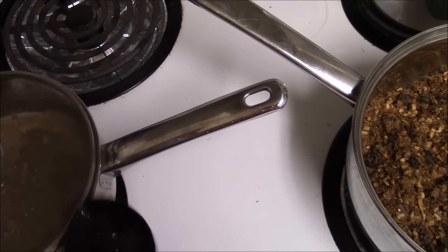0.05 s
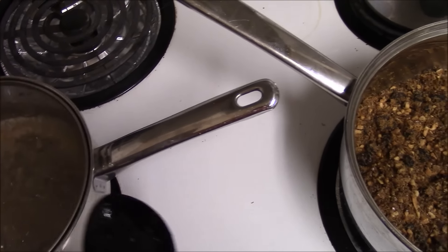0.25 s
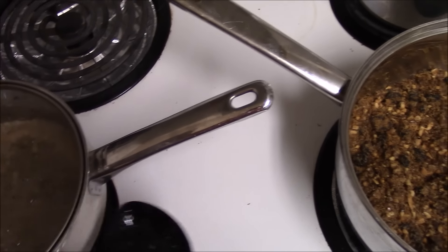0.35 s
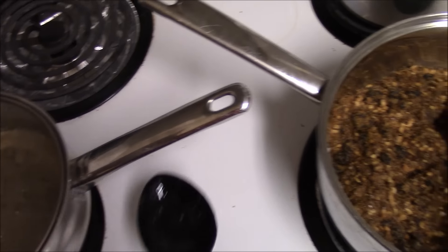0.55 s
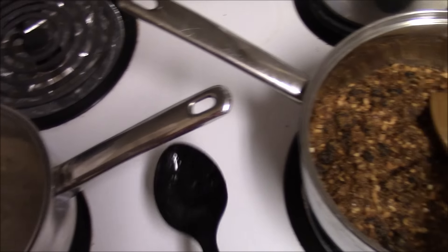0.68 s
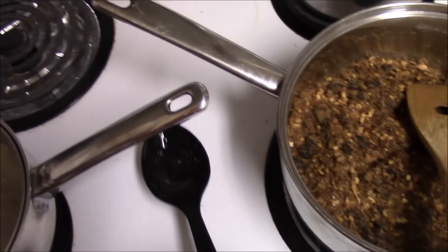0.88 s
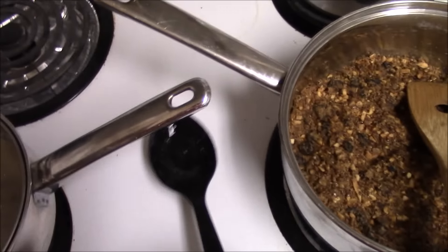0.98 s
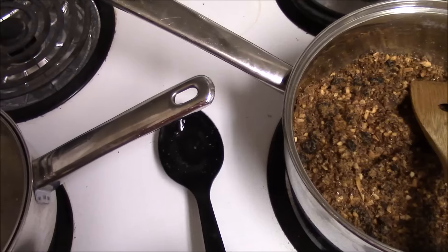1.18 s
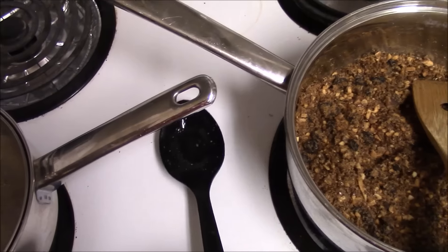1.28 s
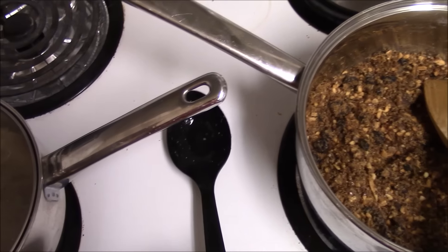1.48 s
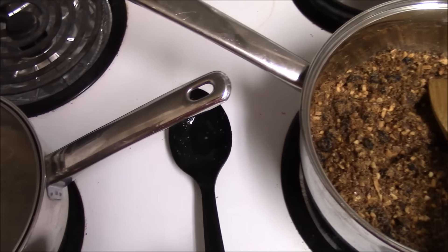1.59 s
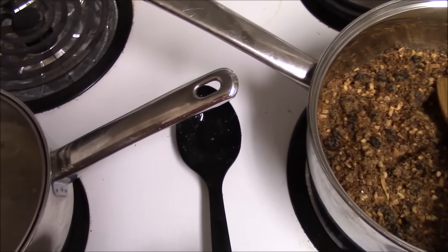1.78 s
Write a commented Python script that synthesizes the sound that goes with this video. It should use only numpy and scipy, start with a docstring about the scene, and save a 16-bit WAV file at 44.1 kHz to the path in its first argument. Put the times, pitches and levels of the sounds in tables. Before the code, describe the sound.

Loud clatter of a metal saucepan set down on an electric stove, fading into even rocking ticks, then a hollow thud and a few small bright spoon taps, heard close up in a small kitchen with fan hum.

```python
"""In a small kitchen with a fan hum, a steel saucepan lands on a coil burner, clatters and rocks to rest.
Soft bumps precede it; dull stove-top knocks and plastic spoon taps on a steel handle follow.
Impacts excite decaying modes, dense ringing in noise bands and a contact click (modal synthesis).
Friction and fan are coloured noise, hum is narrow resonances driven by noise, and the room is a
decaying noise tail."""
import sys
import numpy as np
from scipy import signal
from scipy.fft import rfft, irfft, next_fast_len
from scipy.io import wavfile
from scipy.ndimage import uniform_filter1d

SR = 44100
rng = np.random.default_rng(int(sys.argv[2]) if len(sys.argv) > 2 else 0)


def undo_db(level):
    """Turn decibels back into plain size, where 20 dB means ten times bigger."""
    steps = np.asarray(level, float) / 20
    return 10 ** steps


def master(y):
    """Save y as 16-bit WAV."""
    cut = np.clip(np.atleast_2d(y).T, -1, 1)
    pcm = np.round(cut * 32767)  # scale
    wavfile.write(sys.argv[1], SR, pcm.astype(np.int16))


N = 81585  # samples


def at(table, hz):
    """Interpolation on a log-frequency axis: read (Hz, value) points."""
    table = np.array(table, float)
    return np.interp(np.log(hz), np.log(table[:, 0]), table[:, 1])


def shaped(x, gain):
    """Linear filtering: multiply the spectrum by a gain given as a function of Hz."""
    hz = np.maximum(np.arange(N + 1) * SR / (2 * N), 1)
    return irfft(rfft(x, 2 * N) * gain(hz), 2 * N)[:len(x)]


# third-octave band centres [Hz]
BANDS = 30 * 2 ** np.arange(0, 9.2, 1 / 3)


def noise_bands():
    """Third-octave analysis in reverse: independent noise bands of equal level per Hz."""
    size = next_fast_len(N)
    f = np.maximum(np.arange(size // 2 + 1) * SR / size, 1)
    for hz in BANDS:
        white = rng.standard_normal((2, len(f))) * np.sqrt(size / 2)
        gain = np.cos(np.pi / 2 * np.clip(3 * np.log2(f / hz), -1, 1))
        yield hz, irfft((white[0] + 1j * white[1]) * gain, size)[:N]


def decay(kicks, t60, hz=0):
    """Damped resonance: each kick dies by 60 dB over t60 [s] while its phase turns at hz."""
    pole = np.exp((2j * np.pi * hz - np.log(1000) / t60) / SR)
    return signal.lfilter([1], [1, -pole], kicks)


def t60_at(pair, hz):
    """Frequency-dependent damping: log interpolation of decay times given at 300 Hz and 8 kHz."""
    return np.exp(at([(300, np.log(pair[0])), (8000, np.log(pair[1]))], hz))


def strike(blows, modes, body, t60, mode_db, body_db, click_db, scatter_db, rise_s):
    """Modal impact: blows excite modes, dense ringing and a click; soft contact lowpasses the force."""
    start_s, level_db, corner_hz = np.array(blows, float).T
    i = np.clip((start_s * SR).astype(int), 0, N - 1)

    def kicks(hz, extra):
        """Contact spectrum: impulses weakened above each blow's corner."""
        force = np.zeros(N, complex)
        np.add.at(force, i, undo_db(level_db) / np.sqrt(1 + (hz / corner_hz) ** 6) * extra)
        return force

    out = np.zeros(N)
    mode_scatter = rng.standard_normal((len(blows), len(modes)))
    for k, (hz, db, mode_t60) in enumerate(modes):
        push = kicks(hz, undo_db(db + mode_db + scatter_db * mode_scatter[:, k]))
        # subtracting a short decay softens the onset
        out = out + (decay(push, mode_t60, hz) - decay(push, 4 * rise_s, hz)).imag

    rise = np.hanning(max(int(rise_s * SR), 1) + 2)[1:-1]
    band_scatter = rng.standard_normal((len(blows), len(BANDS)))
    for k, (hz, band) in enumerate(noise_bands()):
        power = kicks(hz, undo_db(scatter_db * band_scatter[:, k])).real ** 2
        # power falls twice as fast in dB as the amplitude decay used by the filter
        ringing = np.abs(decay(power, t60_at(t60, hz) / 2).real)
        click = undo_db(2 * click_db) * np.abs(decay(power, 0.0066).real)
        envelope = np.convolve(np.sqrt(ringing + click), rise / rise.sum())[:N]
        out = out + undo_db(at(body, hz) + body_db) * band * envelope
    return out


def steady(colour, db, flicker_db, rate):
    """Stationary coloured noise: band levels wander independently; the sum is scaled to db."""
    hold = int(SR / rate)
    out = np.zeros(N)
    for hz, band in noise_bands():
        steps = np.repeat(rng.standard_normal(N // hold + 1), hold)
        flicker = flicker_db * uniform_filter1d(steps, hold)[:N]
        out = out + undo_db(at(colour, hz) + flicker) * band
    return out * undo_db(db) / np.std(out)


FAN_DB = -43  # level before any stereo filtering
# fan noise spectrum: pitch_hz [Hz], relative level_db [dB per Hz]
FAN_COLOUR = [(25, -50), (60, -37.5), (100, -25.5), (160, -16), (220, -8), (320, -5), (450, -10.5),
              (600, -16), (1000, -19), (2000, -32.5), (4000, -40), (8000, -43.5), (13000, -51.5),
              (16000, -62)]


def fan():
    """Broadband flow-like noise: a low-weighted spectrum with slow band flicker."""
    return steady(FAN_COLOUR, FAN_DB, flicker_db=2.0, rate=11)


# filter for the fan's left-right difference: pitch_hz [Hz], gain_db [dB]
FAN_SIDE_GAIN = [(60, -13), (110, -10), (200, -25.5), (380, -27), (700, -20.5), (1290, -17.5), (2380, -10),
                 (5000, -11), (8000, -16), (11000, -35), (16000, -50.5)]


def fan_side():
    """Interchannel decorrelation: a separate fan noise, opposite in sign left and right."""
    noise = steady(FAN_COLOUR, FAN_DB + 3.5, flicker_db=1.5, rate=12)
    return shaped(noise, lambda f: undo_db(at(FAN_SIDE_GAIN, f)))


# wavering tones of fan and mains: pitch_hz [Hz], level_db [dB], width_hz [Hz]
HUM_TONES = [(121.4, -56.5, 21), (295.5, -52.5, 14), (343.4, -47.5, 4.8), (414.2, -55.5, 7.5)]


def hum():
    """Narrowband resonance: noise rings sharp filters, giving wavering tones of fan and mains."""
    out = np.zeros(N)
    for pitch_hz, level_db, width_hz in HUM_TONES:
        tone = decay(rng.standard_normal(N), np.log(1000) / (np.pi * width_hz), pitch_hz).imag
        out = out + undo_db(level_db) * tone / np.std(tone)
    return out


# faint scraping of pan and spoon: start_s [s], level_db [dB]
SCRAPE_LEVEL = [(0, -47), (.03, -49), (.06, -46), (.095, -44), (.2, -54), (.55, -52.5), (.7, -51),
                (.85, -58), (1.0, -76), (1.25, -62), (1.33, -59.5), (1.47, -58.5), (1.6, -67.5),
                (1.85, -58)]
# friction spectrum: pitch_hz [Hz], relative level_db [dB per Hz]
SCRAPE_SPECTRUM = [(400, -39.5), (1000, -4.5), (3300, 0), (4200, -9), (8000, -12.5), (16000, -31)]
# treble change above about 4 kHz: start_s [s], gain_db [dB]
SCRAPE_TREBLE = [(0, 1.5), (.1, 1), (.3, -2), (1.85, -22)]


def scrape():
    """Friction as flickering noise, its level and treble following separate envelopes."""
    t = np.arange(N) / SR
    noise = steady(SCRAPE_SPECTRUM, 0, flicker_db=5.0, rate=50)
    low = shaped(noise, lambda f: 1 / (1 + (f / 4200) ** 8))
    treble = undo_db(np.interp(t, *np.array(SCRAPE_TREBLE).T)) * (noise - low)
    return undo_db(np.interp(t, *np.array(SCRAPE_LEVEL).T)) * (low + treble)


# soft hollow bumps before the landing: start_s [s], relative level_db [dB], contact corner_hz [Hz]
BUMP_BLOWS = [(.004, -40, 700), (.03, -37, 700), (.063, -36.5, 700), (.072, -33, 700), (.0835, -21, 590),
              (.098, -23, 600)]
# bump resonances: pitch_hz [Hz], relative level_db [dB], t60_s [s]
BUMP_RESONANCES = [(396.7, 5, 0.1), (500, -19.5, 0.04)]
# dense stove-top ringing, also for thumps and knocks: pitch_hz [Hz], relative level_db [dB per Hz]
TOP_SPECTRUM = [(60, -53), (125, -23.5), (170, -40.5), (279, -1), (500, -3), (1000, -5.5), (2160, -23),
                (4000, -13.5), (8000, -25.5), (16000, -50)]
TOP_T60_S = .2, 0.047  # at 300 Hz and 8 kHz


def bumps():
    """Low-mode impact: soft contact excites chiefly two hollow resonances."""
    return strike(BUMP_BLOWS, BUMP_RESONANCES, TOP_SPECTRUM, TOP_T60_S,
                  mode_db=1.0, body_db=4, click_db=-9, scatter_db=3.0, rise_s=0.0021)


# pan blows: start_s [s], relative level_db [dB], contact corner_hz [Hz] (lower = softer)
CRASH_BLOWS = [(.105, -19.5, 12000), (.117, -14, 12200), (.1218, -6, 5040), (.129, -8.5, 4000),
               (.1398, -9.5, 11000), (.146, -9, 5050), (.152, -14, 14100), (.167, -13.5, 7900),
               (.178, -10.5, 6000), (.186, -23, 12000), (.191, -14.5, 12000), (.198, -16.5, 6000),
               (.208, -28, 5000), (.219, -24, 4923), (.232, -18, 6000), (.247, -25, 14100),
               (.263, -17.5, 5000), (.272, -19, 4870), (.281, -23, 4820), (.296, -36, 4030),
               (.32, -39, 3050), (.565, -40.5, 3000)]
# pan resonances, also for rocking: pitch_hz [Hz], relative level_db [dB], t60_s [s]
PAN_RESONANCES = [(610, -10, .2), (742, -11, .15), (904, -7, .22), (1085, -10, .6), (1240, -18, .2),
                  (1513, -7, .18), (1782, -10, .15), (1999, -1, .11), (2107, -7, .13), (2150, -7, .13),
                  (2509, -8, .13), (2700, -9, .12), (3089, -4, .15), (3643, -5, .12), (3993, -11, .12),
                  (4133, -3, .14), (5669, -16, .08), (6632, -16, .08)]
# dense pan ringing, also for chimes: pitch_hz [Hz], relative level_db [dB per Hz]
PAN_SPECTRUM = [(60, -56), (125, -21), (170, -24), (256, -1), (515, -13.5), (1000, -7), (1410, -15),
                (2050, -6), (4000, -11.5), (5000, -17.5), (7750, -16), (12700, -27.5), (16000, -45)]
PAN_T60_S = 0.19, 0.14  # at 300 Hz and 8 kHz


def pan_crash():
    """Repeated modal impact: hard blows, with weakening random chatter of pan on coil among them."""
    first_s, last_s = .122, 0.26
    u = rng.random((30, 2))
    after_s = (last_s - first_s) * u[:, 0]
    level_db = -18.5 - 87 * after_s - 8 * u[:, 1]
    chatter = np.c_[first_s + after_s, level_db, np.full(30, 6000)]  # corner in Hz
    return strike(np.r_[CRASH_BLOWS, chatter], PAN_RESONANCES, PAN_SPECTRUM, PAN_T60_S,
                  mode_db=-11, body_db=11.5, click_db=4, scatter_db=2.5, rise_s=0.00031)


# burner thumps under the pan's weight: start_s [s], relative level_db [dB], contact corner_hz [Hz]
THUMP_BLOWS = [(.122, -11.5, 500), (.1285, -11, 500), (.14, -11.5, 500), (.167, -25, 500),
               (.208, -16.5, 600), (.218, -18.5, 600), (.27, -28, 603), (.318, -23, 600)]
# burner resonances: pitch_hz [Hz], relative level_db [dB], t60_s [s]
BURNER_RESONANCES = [(125, -8, .25), (230, -8, .1), (264, 0, .12), (345, -6, .15), (445, -8, .12)]


def burner_thumps():
    """Load impact: the pan's weight excites low burner modes."""
    return strike(THUMP_BLOWS, BURNER_RESONANCES, TOP_SPECTRUM, TOP_T60_S,
                  mode_db=-2.0, body_db=12, click_db=-4.5, scatter_db=1.5, rise_s=0.0011)


# a utensil against the pan: start_s [s], relative level_db [dB], contact corner_hz [Hz]
CHIME_BLOWS = [(.1398, -10, 15000), (.152, -17, 15000), (.189, -35.5, 15000), (.247, -34, 15200)]
# chime resonances: pitch_hz [Hz], relative level_db [dB], t60_s [s]
CHIME_RESONANCES = [(7666, 0, .035), (9800, -11, .04), (12500, -10, .03)]


def utensil_chimes():
    """High-mode impact: hard contact of a utensil with the pan excites short treble modes."""
    return strike(CHIME_BLOWS, CHIME_RESONANCES, PAN_SPECTRUM, PAN_T60_S,
                  mode_db=-0.5, body_db=-6, click_db=6, scatter_db=-1.5, rise_s=.0003)


# rocking contacts on an even beat: start_s [s], relative level_db [dB], contact corner_hz [Hz]
ROCK_BLOWS = [(0.3824, -30, 3720), (0.4975, -29.5, 4250), (0.6114, -37.5, 3030), (.72, -37, 3150),
              (0.8325, -40.5, 2170), (.949, -46.5, 2480), (1.064, -60, 1940)]
# dense rocking sound, also for the tick: pitch_hz [Hz], relative level_db [dB per Hz]
ROCK_SPECTRUM = [(200, -30), (600, 2), (900, 1), (1300, 2.5), (2000, -5), (3000, -3), (4000, -16),
                 (7500, -18), (16000, -45)]


def pan_rocking():
    """Periodic contact: slow-rising, mostly weakening blows excite the pan on an even beat."""
    return strike(ROCK_BLOWS, PAN_RESONANCES, ROCK_SPECTRUM, (.2, .08),
                  mode_db=-17.5, body_db=9, click_db=-4, scatter_db=4.0, rise_s=0.0063)


# a lone dull tick while the pan rocks: start_s [s], relative level_db [dB], contact corner_hz [Hz]
TICK_BLOWS = [(.4704, -37, 3600)]
# tick resonances: pitch_hz [Hz], relative level_db [dB], t60_s [s]
TICK_RESONANCES = [(1090, -11, .1), (1500, -9, .05), (2550, -3, .035), (2750, 0, .04), (3430, 0, .045)]


def tick():
    """Strong damping: one contact excites briefly ringing modes."""
    return strike(TICK_BLOWS, TICK_RESONANCES, ROCK_SPECTRUM, (.1, .05),
                  mode_db=0, body_db=8, click_db=0, scatter_db=1, rise_s=.0012)


# stove-top knocks: start_s [s], relative level_db [dB], contact corner_hz [Hz]
KNOCK_BLOWS = [(1.2234, -16.5, 1550), (1.228, -24.5, 700), (1.234, -30, 1500), (1.24, -30, 1400),
               (1.251, -39, 596), (1.266, -51, 1200), (1.295, -33.5, 560), (1.662, -32, 452),
               (1.685, -32, 450), (1.795, -40.5, 500), (1.832, -34.5, 1220)]
# stove-top resonances: pitch_hz [Hz], relative level_db [dB], t60_s [s]
TOP_RESONANCES = [(290, -5, .1), (350, -2, .1), (463, 0, .1), (614, 0, .09), (700, 3, .08), (800, -4, .06),
                  (953, -5, .1), (1104, -10, .09), (1292, -15, .08), (1561, -18, .08), (2400, -20, .05)]


def stove_knocks():
    """Soft-contact impact: a low force spectrum excites the stove top's lower modes."""
    return strike(KNOCK_BLOWS, TOP_RESONANCES, TOP_SPECTRUM, TOP_T60_S,
                  mode_db=-6, body_db=16.5, click_db=-4.0, scatter_db=2.25, rise_s=0.0015)


# plastic spoon on a steel handle: start_s [s], relative level_db [dB], contact corner_hz [Hz]
TAP_BLOWS = [(1.6612, -25, 12000), (1.667, -37, 9000), (1.7935, -33.5, 6730), (1.826, -46, 2920)]
# tap resonances: pitch_hz [Hz], relative level_db [dB], t60_s [s]
TAP_RESONANCES = [(1572, -14, .1), (2363, 0, .07), (2514, -5, .08), (2740, -3, .08), (2961, -7, .06),
                  (3300, -5, .05), (3550, -4, .1), (4183, -6, .06), (4479, -2, .045), (4791, -4, .045),
                  (5868, -17, .05), (6530, -8, .05), (6640, -11, .05), (6950, -15, .05), (11110, -12, .025)]
# dense tap ringing: pitch_hz [Hz], relative level_db [dB per Hz]
TAP_SPECTRUM = [(200, -33), (600, -17.5), (1050, -8), (1930, -8), (2500, -5), (3630, 0), (4800, -20),
                (5500, -11), (6730, -13.5), (11500, -24), (16000, -50.5)]


def spoon_taps():
    """Light modal impact: spoon-on-handle contact excites bright, short modes."""
    return strike(TAP_BLOWS, TAP_RESONANCES, TAP_SPECTRUM, (0.69, 0.053),
                  mode_db=-2, body_db=12, click_db=6, scatter_db=0.5, rise_s=.0008)


def room(x, t60):
    """Reverberation by convolution: a unit-energy noise tail, shorter in the treble."""
    t = np.arange(SR // 2) / SR
    tail = sum(band[:len(t)] * undo_db(-60 * t / t60_at(t60, hz)) for hz, band in noise_bands())
    tail = tail * (t > .016 * t60[1])  # first-echo delay scales with treble decay
    return signal.fftconvolve(x, tail / np.sqrt(np.sum(tail ** 2)))[:N]


# filter for the hits' left-right difference: pitch_hz [Hz], gain_db [dB]
HIT_SIDE_GAIN = [(60, -29), (110, -41), (200, -78), (380, -32), (700, -27.5), (1290, -23), (2380, -18.5),
                 (4400, -10), (8120, -11.5), (15000, -25.5)]


def hit_side(hits):
    """Stereo difference: filtered early echoes and direct sound, opposite in sign left and right."""
    early = room(hits, (0.092, .06))
    return shaped(undo_db(-4.5) * early + undo_db(-18.5) * hits, lambda f: undo_db(at(HIT_SIDE_GAIN, f)))


def scene():
    """Superposition: impacts and friction in the room, over fan and hum, as mid plus or minus side."""
    hits = scrape() + bumps() + pan_crash() + burner_thumps() + utensil_chimes()
    hits = hits + pan_rocking() + tick() + stove_knocks() + spoon_taps()
    hits = shaped(hits, lambda f: 1 / np.sqrt(1 + (130 / f) ** 8))  # small things radiate no deep bass
    mid = hits + undo_db(-10.5) * room(hits, (0.48, .25)) + fan() + hum()
    side = hit_side(hits) + fan_side()
    return np.array([mid + side, mid - side])


def top_cut(x):
    """Nothing passes above the cut-off."""
    return signal.sosfilt(signal.butter(12, 16160, fs=SR, output="sos"), x)


def record(dry):
    """Highpass response and saturation: the microphone loses deep bass; loud peaks round off."""
    highpass = signal.butter(2, 90, "high", fs=SR, output="sos")
    x = signal.sosfilt(highpass, dry)
    mix = np.tanh(0.79 * x) / 0.81
    return top_cut(mix)


dry = scene()
out = record(dry)
master(out)
```